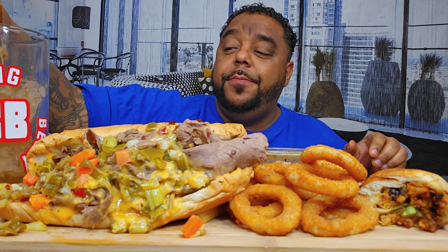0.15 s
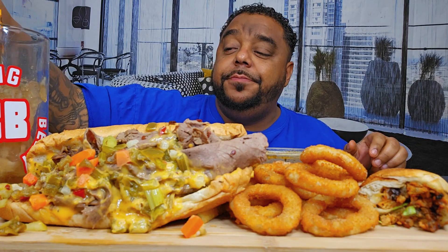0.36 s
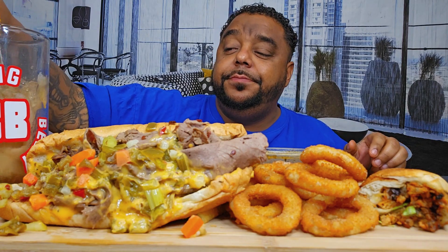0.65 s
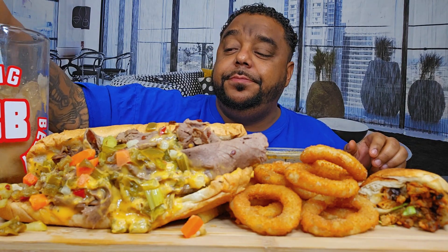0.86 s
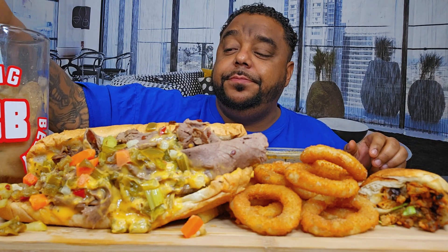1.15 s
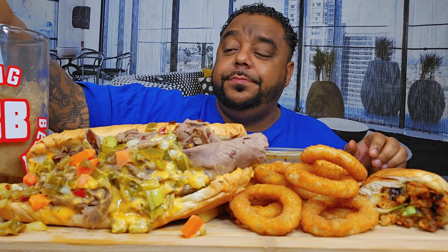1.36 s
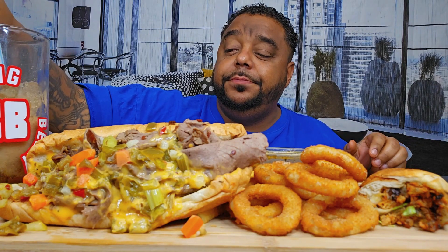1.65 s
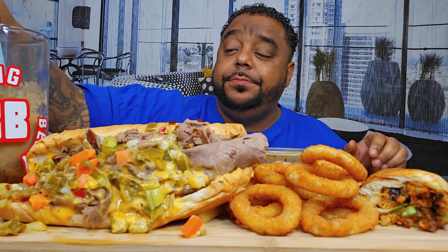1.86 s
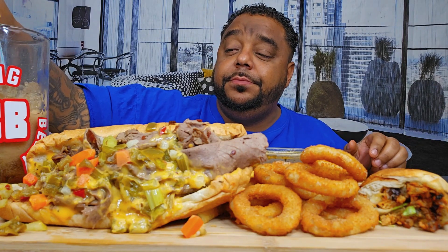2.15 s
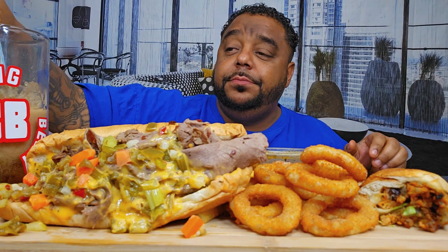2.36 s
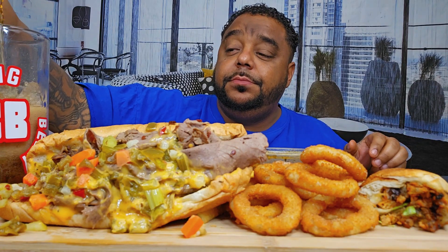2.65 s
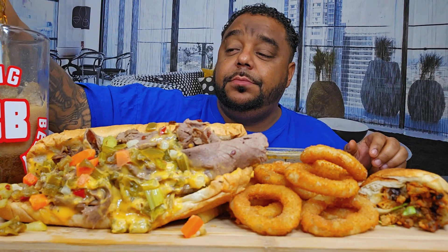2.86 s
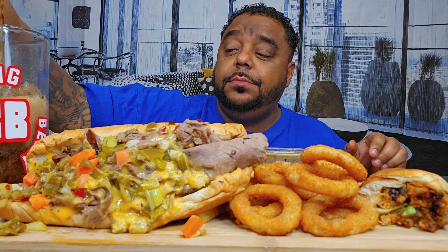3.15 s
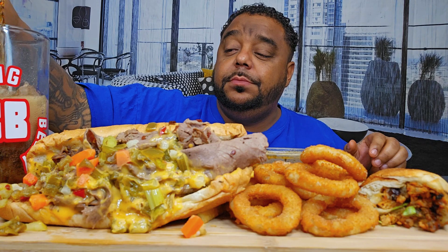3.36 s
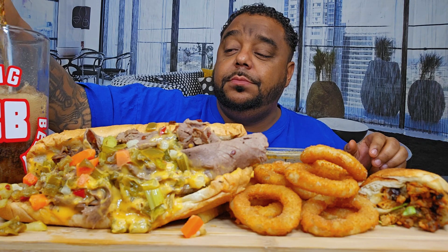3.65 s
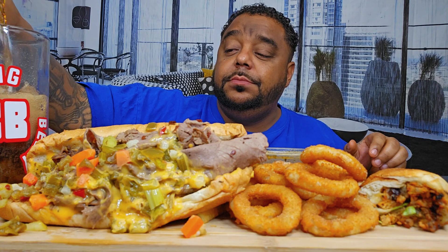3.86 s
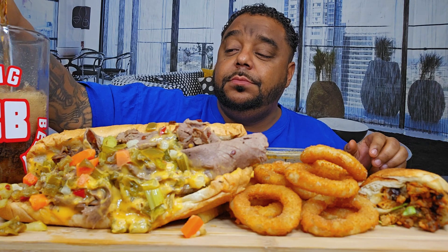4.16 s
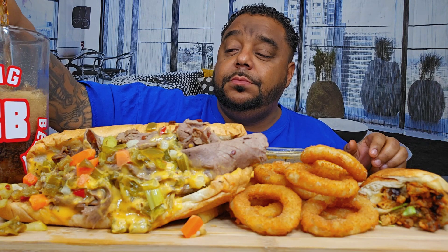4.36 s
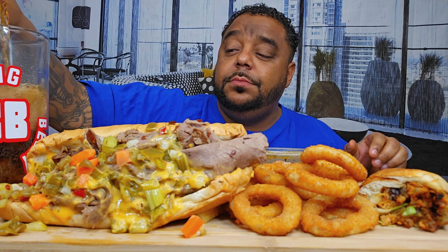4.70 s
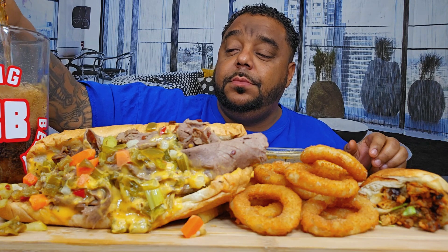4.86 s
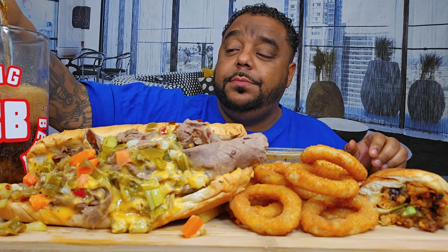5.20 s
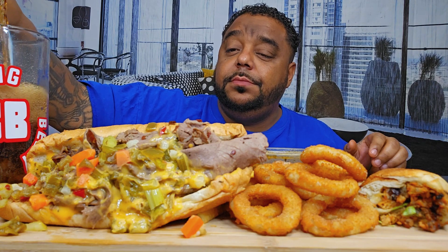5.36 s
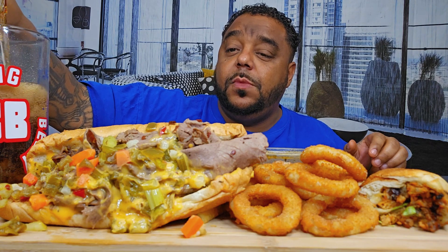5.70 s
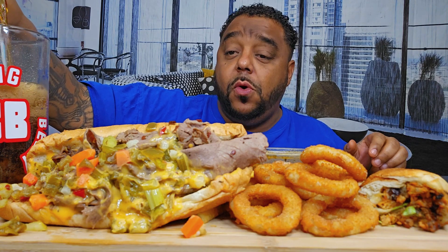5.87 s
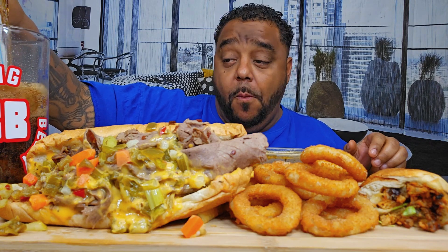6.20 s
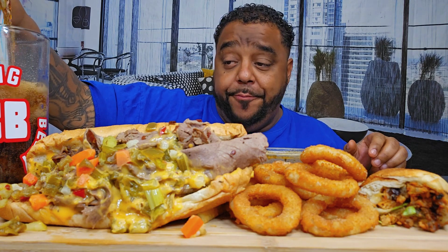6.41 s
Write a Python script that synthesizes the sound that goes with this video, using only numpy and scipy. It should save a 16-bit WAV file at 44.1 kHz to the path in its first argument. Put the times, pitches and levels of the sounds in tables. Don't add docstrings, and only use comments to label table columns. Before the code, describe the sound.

Very close to the microphone in a quiet kitchen, soda pours from a can onto bare ice in a tall glass. First drops spit and pop, then bubbles merge into dense hiss with soft glugs and a rising hollow tone. Around the middle the ice scrapes and knocks the glass, the foam crackles hard, and later the ice cracks once while pouring continues over faint motor hum.

```python
import sys
import numpy as np
from scipy import signal
from scipy.fft import rfft, irfft
from scipy.io import wavfile
from scipy.ndimage import uniform_filter1d

SR = 44100
rng = np.random.default_rng(int(sys.argv[2]) if len(sys.argv) > 2 else 0)


def invert_db(level):
    return 10 ** (np.asarray(level, dtype=float) / 20)


def wrap_up_sound(samples):
    columns = np.atleast_2d(samples).T
    tamed = np.clip(columns, -1, 1)
    steps = np.round(tamed * 32767).astype(np.int16)
    wavfile.write(sys.argv[1], SR, steps)


N = 288414

# [t/s, stream level over its mean/dB, foam crispness/dB]
STREAM = [(0, -1, -8), (.35, -1.1, -7), (.75, -1.35, -5.5), (1.0, -.6, -8), (1.45, .9, -7.5),
          (1.95, .9, -11), (2.45, -0.3, -12), (3.0, -0.4, -9.5), (3.2, 0.6, -9), (3.5, 0.3, -8),
          (3.9, -0.3, -9), (4.5, 0.04, -5), (4.85, -1.1, -7), (5.1, -0.54, -5.5), (6.0, -0.3, -5),
          (6.54, -1, -7.5)]
# [t/s, level/dB]
FOAM_CRACKLE = [
    (0, -2),
    (2.2, -2),
    (3.2, -3.5),
    (3.6, 4),
    (4.9, 4),
    (6.54, -1),
]
# [t/s, grind level/dB, thud level/dB]
ICE_SLIDE = [
    (3.05, -46, -56),
    (3.062, -39, -44),
    (3.098, -32, -45),
    (3.196, -41.5, -43),
    (3.214, -32.5, -41),
    (3.244, -32, -54),
    (3.284, -35, -44),
    (3.34, -43, -61),
]
FIZZ_DB = -40


def evened(x):
    return x / np.sqrt(np.mean(x ** 2) + 1e-20)


def columns(rows):
    s, *values = np.transpose(rows)
    return [np.interp(np.arange(N) / SR, s, v) for v in values]


def travel(first, last, s, abrupt):
    return last + (first - last) * np.exp(-(np.arange(N) / SR / s) ** abrupt)


def swell(s, half_s):
    return np.exp(-((np.arange(N) / SR - s) / half_s) ** 2)


def coloured(x, points):
    f, db = np.transpose(points)
    hz = np.fft.rfftfreq(len(x), 1 / SR)
    gain = invert_db(np.interp(np.log(hz + 1), np.log(f + 1), db))
    return evened(irfft(rfft(x) * gain, len(x)))


def band(x, lo_hz, hi_hz):
    sos = signal.butter(2, [lo_hz, min(hi_hz, .49 * SR)], "band", fs=SR, output="sos")
    return signal.sosfilt(sos, x)


def resonate(x, hz, widths):
    turn = np.exp(2j * np.pi * np.cumsum(hz) / SR)
    results = []
    for pole in np.exp(-np.pi * np.array(widths) / SR):
        smooth = signal.lfilter([1], np.poly([pole, pole, pole]), x / turn)
        results.append(evened((turn * smooth).real))
    return results


def bursts(per_s, spread_db):
    excess = np.minimum(rng.exponential(1, N), 3.5)
    size = invert_db(spread_db * excess) * rng.standard_normal(N)
    return evened(size * (rng.random(N) < per_s / SR))


def lesser(db, spread_db, lo_hz, hi_hz, count):
    when, size, pitch = rng.random((count, 3)).T
    density = np.cumsum(invert_db(1.6 * columns(FOAM_CRACKLE)[0]))
    s = np.searchsorted(density, when * density[-1]) / SR
    return list(zip(s, db + spread_db * size, lo_hz * (hi_hz / lo_hz) ** pitch))


def add(mix, s, sound):
    part = mix[round(s * SR):][:len(sound)]
    part += sound[:len(part)]


def ring(db, hz, t60, rise_ms, glide=0.):
    t = np.arange(round(max(t60, .004) * SR)) / SR
    rise = 1 - np.exp(-(1000 * t / max(rise_ms, .05)) ** 2)
    shape = rise * invert_db(-60 * t / t60)
    return invert_db(db) * shape / shape.max() * np.sin(2 * np.pi * hz * t * (1 + glide * t / t60))


def tear(noise, ms):
    t = np.arange(len(noise)) / SR * 1000 / ms
    return evened(noise) * t * np.exp(1 - t)


def kitchen():
    # [f/Hz, level/dB per Hz]
    rumble_spectrum = [(12, -40), (22, -16), (35, -19), (60, -1), (100, 0.5), (170, -4.5), (230, -0.5),
                       (280, -4.5), (330, -37), (450, -31.5)]
    # [f/Hz, rms level/dB, growth/dB per s, waver/dB]
    motor_hum = [(24, -74, -5.5, -1), (52.7, -61, 0, 3.5), (59.5, -59.5, 0.5, 2.5), (72.9, -65.5, 2, 2),
                 (120.3, -62, 0, 1.5), (222.6, -64, 0, 2.5), (237.3, -60.5, -0.5, 1),
                 (258.5, -55.5, 0, 0.5), (302, -68, 0, 3.5), (336, -82.5, -0.5, 4)]
    t = np.arange(N) / SR
    out = invert_db(-58) * coloured(rng.standard_normal(N), rumble_spectrum)
    for hz, db, growth_db, waver_db in motor_hum:
        waver, drift = (evened(uniform_filter1d(rng.standard_normal(N), size=8000)) for _ in "ab")
        turns = hz * t + rng.random() + 0.047 * waver_db * drift
        level = np.sqrt(2) * invert_db(db + growth_db * t + waver_db * waver)
        out += level * np.sin(2 * np.pi * turns)
    return out


def fizz():
    # [f/Hz, level/dB per Hz]
    hiss_spectrum = [(280, -60), (420, -57), (700, -12), (1300, -8.5), (2400, -6), (3850, -10.5),
                     (5000, -8.5), (6330, -4), (8000, -6), (9290, -9.5), (11300, -8), (12600, -13.5),
                     (14500, -12), (15800, -11)]
    stream_db, bright_db = columns(STREAM)
    foam = rng.standard_normal(N) + .5 * band(bursts(per_s=4000, spread_db=2.0), 1450, 20000)
    for hz in np.geomspace(4500, 15500, num=12):
        grain = ring(0, hz, 22 / hz, 0.23)
        foam += 0.064 * evened(signal.oaconvolve(bursts(per_s=40, spread_db=2.5), grain)[:N])
    crackle = invert_db(columns(FOAM_CRACKLE)[0])
    for noise in band(rng.standard_normal((6, 200)), 8600, 20500):
        tears = signal.oaconvolve(bursts(per_s=20, spread_db=1.5), tear(noise, 1.0))[:N]
        foam += .14 * crackle * evened(tears)
    foam = coloured(foam, hiss_spectrum)
    crisp = band(foam, 5650, 25000)
    return invert_db(FIZZ_DB + stream_db + 3.0) * (foam + (invert_db(bright_db + 3.5) - 1) * crisp)


def air_column():
    # [first f/Hz, last f/Hz, travel t/s, abruptness]
    mode_paths = [(622, 1042, 2.0, 1.06), (1370, 2490, 1.92, 1.2), (3070, 3810, 3.55, 5.3),
                  (4600, 5180, 2.17, 5.8), (7240, 6280, 2.14, 3.8)]
    # [width/Hz, level over its drive/dB]
    mode_shapes = [(167, -1), (700, 2.5), (840, 1.5), (500, -14), (603, -12)]
    t, stream_db = np.arange(N) / SR, columns(STREAM)[0]
    stir_db = .7 * np.maximum(columns(ICE_SLIDE)[0] + 43, 0)
    bare_db = 4.5 * swell(s=.35, half_s=0.19)
    low_db = -49.5 + 1.3655 * t + 0.53 * stream_db + stir_db + bare_db
    high_db = -43.5 - 0.08 * t + 1.4 * stream_db + .22 * stir_db
    fizz_db = FIZZ_DB + stream_db
    drives_db = (low_db, high_db - 4.5, high_db - 4.5, fizz_db, fizz_db)
    foam_share = np.clip(travel(0.16, 0.98, s=2.68, abrupt=2.6), 0, 1)
    out = np.zeros(N)
    for path, (width, db), drive_db in zip(mode_paths, mode_shapes, drives_db):
        splash = rng.standard_normal(N) + 0.59 * bursts(per_s=300, spread_db=3.0)
        sharp, dull = resonate(splash, travel(*path), (1.07 * width, 2.75 * width))
        out += invert_db(drive_db + db) * ((1 - foam_share) * sharp + foam_share * dull)
    return out


def can():
    # [middle t/s, level/dB, half length t/s]
    gulp_table = [
        (.1, -71, .25),
        (1.0, -57.5, 0.22),
        (1.65, -59.5, 0.43),
        (3.0, -66, 0.23),
        (3.31, -59, .08),
        (4.2, -70, .4),
        (5.15, -70, .15),
        (5.415, -61, 0.12),
        (6.1, -55, 0.1),
        (6.5, -55, 0.27),
    ]
    lumps = rng.standard_normal(N) + 0.89 * bursts(per_s=150, spread_db=3.0)
    flow = sum(invert_db(db - 4.0) * swell(s, half_s) for s, db, half_s in gulp_table)
    return flow * evened(band(band(lumps, 290, 650), 290, 650))


def glugs():
    # [t/s, peak level/dB, f/Hz]
    glug_table = [(0.007, -24.5, 1900), (0.021, -27.5, 1030), (0.115, -31, 1220), (0.167, -19.5, 1160),
                  (0.191, -30, 1350), (0.203, -27.5, 1590), (0.217, -22.5, 1070), (0.291, -25.5, 670),
                  (0.452, -37, 714), (0.568, -29, 730), (0.954, -30, 2180), (0.978, -32, 750),
                  (1.522, -25.5, 855), (2.063, -23.5, 930), (3.066, -24, 830), (4.386, -26.5, 2400),
                  (4.439, -32, 960), (4.512, -26.5, 1050), (4.593, -20.5, 974), (4.617, -29, 900),
                  (4.657, -24.5, 980), (5.624, -26, 1750), (6.004, -27.5, 1070), (6.068, -29, 1000),
                  (6.272, -25.5, 930), (6.366, -27, 1100), (4.44, -28, 2500), (4.5125, -26, 1550),
                  (4.699, -31, 1500), (0.168, -31, 2050)]
    out = np.zeros(N)
    for s, db, hz in glug_table:
        add(out, s + 0.00081, ring(db - 4.0, hz, 18.5 / hz, 1.0, glide=0.17))
        add(out, s + 0.00078, ring(db - 2.2, 1880, 0.0032, 0.098))
    return out


def snaps():
    # [t/s, peak
    # level/dB, f/Hz]
    snap_table = [(0.0408, -20, 11500), (0.5337, -24, 11800), (0.6664, -25, 10700), (0.7198, -28, 12700),
                  (0.7423, -26, 9500), (0.8121, -24, 10300), (0.843, -23, 10900), (0.8654, -25, 9640),
                  (1.3768, -27, 10200), (1.5444, -23, 10700), (1.6342, -21, 11600), (1.6796, -23, 11400),
                  (1.8377, -22, 10700), (1.886, -26, 11800), (2.1266, -30, 9990), (2.1597, -21, 10300),
                  (2.741, -25, 11600), (3.066, -22, 10200), (3.0864, -28, 10300), (3.3594, -24, 10400),
                  (5.2377, -29, 9910), (5.3958, -24, 9980), (5.4213, -25, 14700), (5.6138, -30, 11300),
                  (5.6258, -22, 10600), (5.6892, -25, 10200), (5.7131, -26, 10000), (5.7949, -25, 12800),
                  (5.8543, -24, 11600), (6.0773, -27, 11000),
                  (3.5344, -26, 11800), (3.5848, -26, 9740), (3.6267, -26, 11500), (3.6406, -26, 12200),
                   (3.6885, -24, 10400), (3.7494, -22, 11100), (3.7698, -29, 11500), (3.8167, -26, 10200),
                   (3.8666, -28, 13900), (3.9429, -10, 10800), (4.0188, -27, 10200), (4.0527, -22, 10600),
                   (4.0644, -24, 11900), (4.0754, -26, 14600), (4.1679, -27, 10300), (4.2063, -27, 10900),
                   (4.2662, -23, 10900), (4.2777, -25, 15400), (4.3306, -23, 10300), (4.3395, -24, 10300),
                   (4.3575, -28, 14400), (4.3874, -27, 11900), (4.4383, -24, 10700), (4.565, -27, 10200),
                   (4.5845, -27, 11800), (4.6009, -23, 11700), (4.6463, -27, 10800), (4.7182, -26, 11700),
                   (4.816, -23, 11700), (4.8409, -24, 11700)]
    chance = lesser(db=-33, spread_db=6, lo_hz=9800, hi_hz=14000, count=70)
    out, rows = np.zeros(N), snap_table + chance
    for (s, db, hz), noise in zip(rows, rng.standard_normal((len(rows), 200))):
        add(out, s + 0.00082, ring(db - 3.5, hz, 0.0051, 0.28))
        add(out, s + .0006, invert_db(db - 9.5) * tear(band(noise, 0.61 * hz, 1.6 * hz), 0.35))
    return out


def pops():
    # [t/s, peak level/dB, f/Hz]
    pop_table = [(0.231, -22, 6700), (0.2763, -18.5, 4900), (0.4706, -22, 6830), (0.5836, -21, 5800),
                 (0.6125, -22, 5700), (0.851, -23, 6570), (0.8749, -24, 5330), (1.1932, -21, 4890),
                 (1.6107, -25, 7090), (2.9687, -27, 7000), (3.0674, -19, 5670), (3.098, -20, 6200),
                 (3.3588, -11.5, 6720), (3.7507, -23, 6650), (3.7743, -23, 6500), (3.8183, -26, 8000),
                 (3.9085, -23, 6520), (3.9439, -13, 6300), (4.0851, -18, 6300), (4.3306, -23, 6400),
                 (4.3874, -23, 6600), (4.4288, -24, 6500), (4.4383, -23, 7200), (4.5221, -19, 6600),
                 (4.6465, -24, 6420), (4.8414, -20, 7340), (5.004, -23, 6190), (5.3727, -22, 6360),
                 (5.7154, -26, 6430), (5.855, -18, 7400)]
    # [t/s, peak level/dB, f/Hz]
    spit_table = [
        (0.0458, -25, 6100),
        (0.0877, -28, 5100),
        (0.1191, -29, 7290),
        (0.1835, -28, 4870),
        (0.196, -29, 4890),
        (0.2454, -26, 5080),
        (0.5342, -29, 6700),
    ]
    pop_ms = 1.27
    chance = lesser(db=-31, spread_db=6, lo_hz=5500, hi_hz=7700, count=24)
    out, rows = np.zeros(N), pop_table + spit_table + chance
    for (s, db, hz), noise in zip(rows, rng.standard_normal((len(rows), 300))):
        add(out, s + .0004, ring(db - 3.5, hz, 0.0059 * pop_ms, 0.35 * pop_ms, glide=0.05))
        add(out, s + .0004, invert_db(db - 11.5) * tear(band(noise, 0.77 * hz, 1.26 * hz), 0.74 * pop_ms))
    return out


def ice():
    # [t/s, peak level/dB, f/Hz, t60/s, rise/ms]
    knock_table = [(3.0975, -17, 2320, .021, .8), (3.104, -27.5, 2270, .13, 3.4),
                   (3.101, -17, 970, .017, .9), (3.099, -35, 2950, .08, 1), (3.1845, -28, 215, .028, 1.2),
                   (3.2115, -28, 230, .032, 1.3), (3.25, -37, 125, .09, 5), (3.359, -11, 7300, .003, .2),
                   (3.9439, -12, 9100, .002, .1), (3.9448, -17, 6600, .007, .55),
                   (3.9457, -14, 7400, .004, .4), (3.9445, -22, 4970, 0.011, 0.39),
                   (5.8552, -10.5, 2720, .012, .6), (5.8593, -16, 2560, .0096, .5),
                   (5.8562, -25, 2100, .008, .5), (5.862, -25, 2750, .02, 1.2),
                   (5.855, -30, 1040, .012, .8), (5.8595, -25, 7600, .005, .4), (6.5, -32, 7700, .011, .5)]
    # [f/Hz, level/dB per Hz]
    grind_spectrum = [(150, -33), (250, -9), (290, -18.5), (583, -6), (635, -8.5), (922, -1.5),
                      (1600, -20.5), (2080, -48), (3520, -120)]
    out = np.zeros(N)
    for s, *knock in knock_table:
        add(out, s, ring(*knock))
    grind_db, thud_db = columns(ICE_SLIDE)
    t = np.arange(N) / SR
    inside_s = np.minimum(t - ICE_SLIDE[0][0], ICE_SLIDE[-1][0] - t)
    sliding = np.clip(inside_s / 0.017, 0, 1)
    slips = bursts(per_s=1500, spread_db=1.0)
    grind = coloured(slips, grind_spectrum)
    thud = evened(band(slips, 96, 356))
    return out + sliding * (invert_db(grind_db - 2.0) * grind + invert_db(thud_db - 3.0) * thud)


def walls(x):
    t = np.arange(SR // 4) / SR
    taps = rng.choice([-1., 1.], len(t)) * (rng.random(len(t)) < 2000 / SR) * (t > .003)
    dull = band(taps, 300, 4000) * invert_db(-60 * t / .19)
    bright = band(taps, 4000, 16000) * invert_db(-60 * t / .03)
    tail = dull / np.linalg.norm(dull) * .36 + bright / np.linalg.norm(bright) * .4
    return signal.oaconvolve(x, tail)[:N]


def scene():
    hits = pops() + snaps() + glugs() + ice()
    mono = fizz() + air_column() + can() + hits + invert_db(-9.5) * walls(hits) + kitchen()
    return np.array([mono, mono])


def low_pass(x):
    return signal.sosfilt(signal.butter(12, 16830, fs=SR, output="sos"), x)


def record(dry):
    limit = signal.firwin(511, 15950, window=("kaiser", 8), fs=SR)
    mix = signal.oaconvolve(dry, limit[None], "same")
    return low_pass(mix)


dry = scene()
out = record(dry)
wrap_up_sound(out)
```